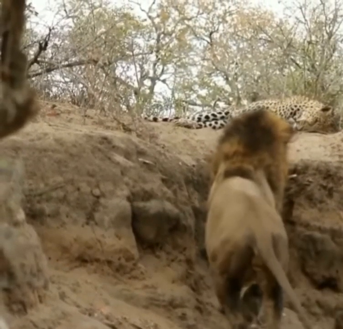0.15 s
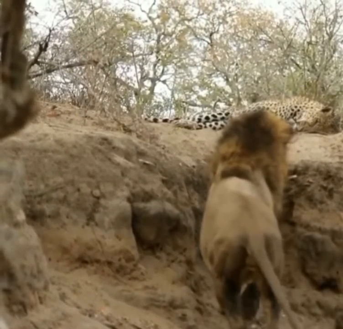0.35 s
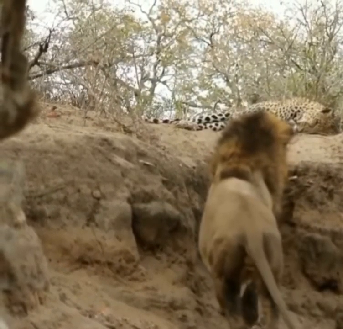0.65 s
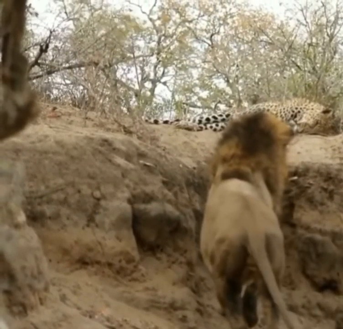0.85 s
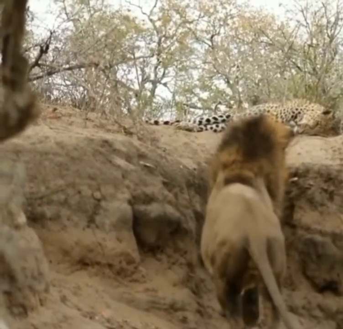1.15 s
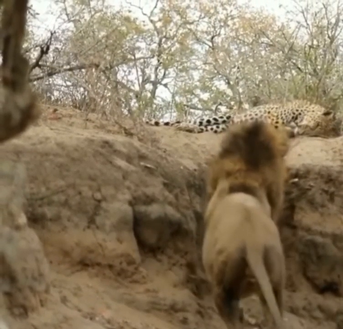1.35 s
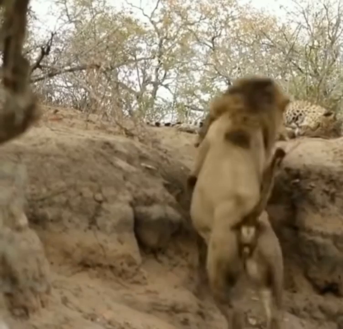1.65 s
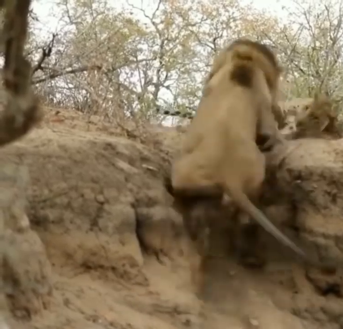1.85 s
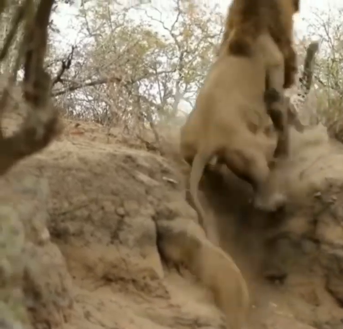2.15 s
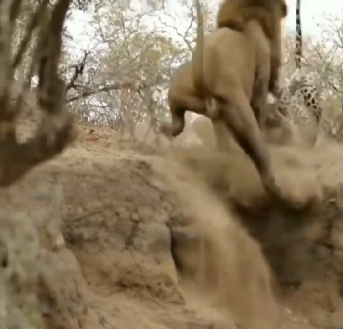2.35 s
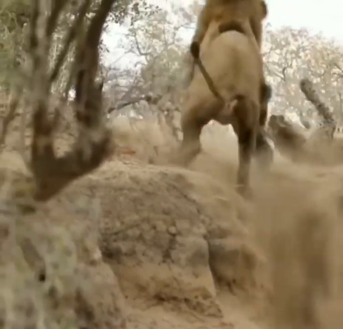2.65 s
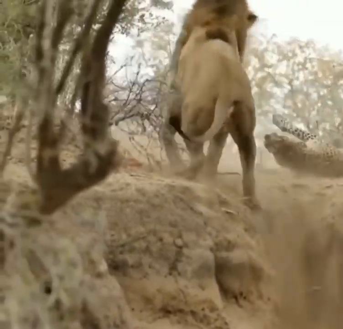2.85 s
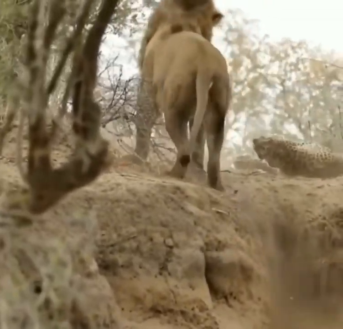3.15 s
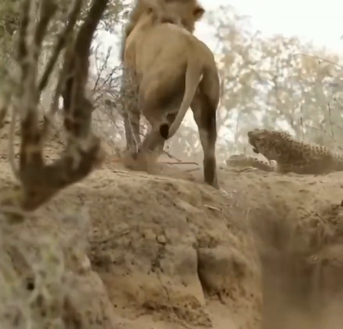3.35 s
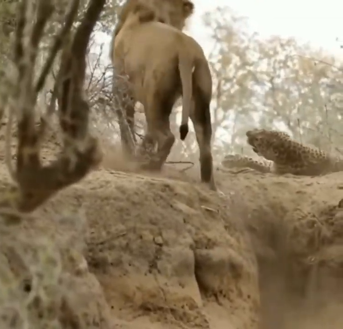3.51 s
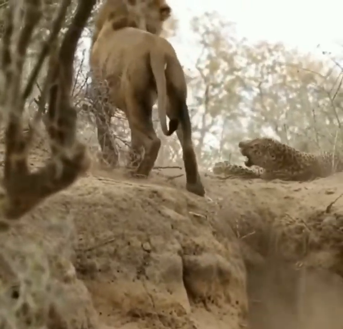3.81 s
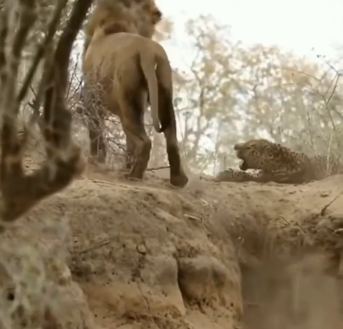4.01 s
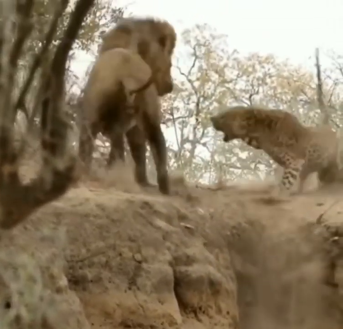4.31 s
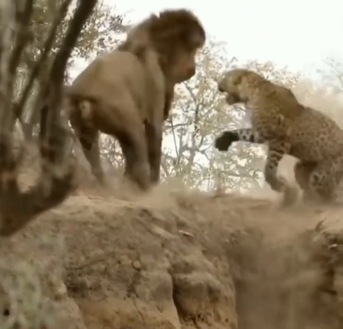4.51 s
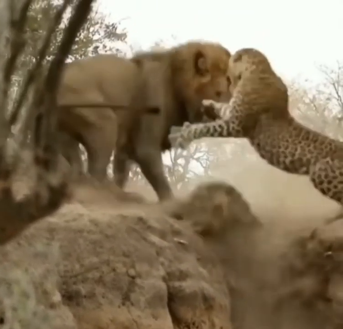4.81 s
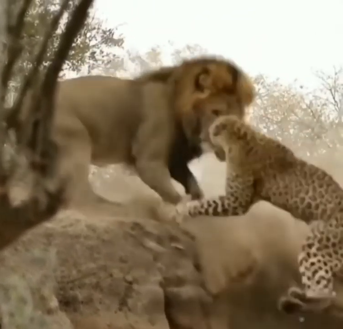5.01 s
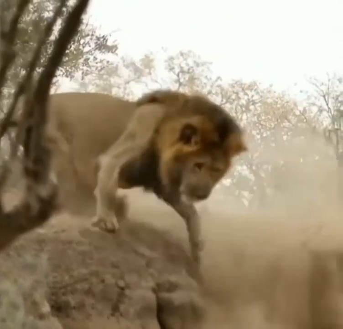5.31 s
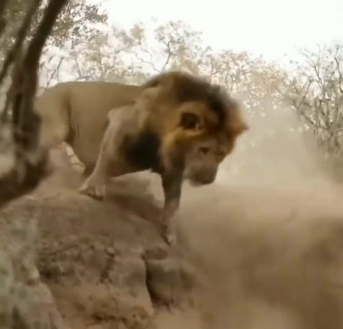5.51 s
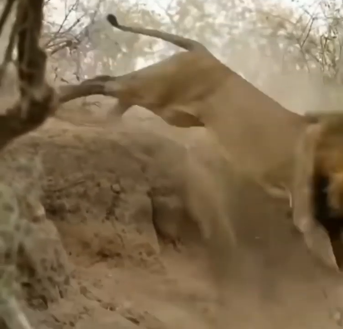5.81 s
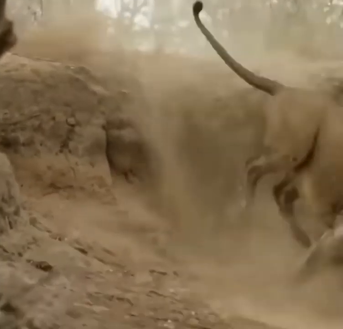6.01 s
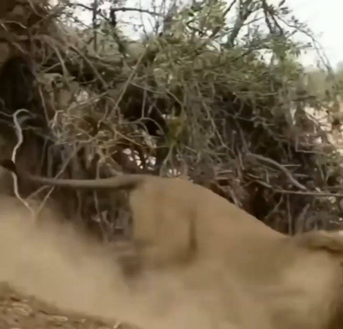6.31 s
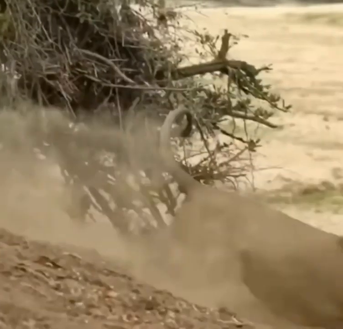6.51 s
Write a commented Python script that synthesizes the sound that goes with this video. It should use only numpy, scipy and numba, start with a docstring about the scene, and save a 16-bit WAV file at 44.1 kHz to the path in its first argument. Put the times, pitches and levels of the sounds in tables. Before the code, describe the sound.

After a quiet, gusty opening, a lion and a leopard growl low and snarl harshly, paws scuffing dry sand amid heavy wind thumps.

```python
"""On a dry earth bank two big cats snarl and growl, heard by a single microphone.
Slack throat tissue flaps and chops the voice, pulses and rough breath, into bursts; throat and mouth resonate.
Paws scatter sand, a noise of dense grains, and twigs snap as short noise bursts, over the faint hiss of bush.
Gusts thump, rumble and pop on the microphone as shaped low noise; a thin faint note slides up early on."""
import sys
import numpy as np
from scipy import signal
from scipy.fft import rfft, irfft, next_fast_len
from scipy.io import wavfile
from scipy.ndimage import uniform_filter1d, map_coordinates
from numba import njit

SR = 44100
rng = np.random.default_rng(int(sys.argv[2]) if len(sys.argv) > 2 else 0)


def transcribe(signal):
    """Save signal, clipped to [-1, 1], as a 16-bit WAV file at the path in sys.argv[1]."""
    frames = np.atleast_2d(signal).T
    limited = np.clip(frames, -1, 1)
    pcm = np.round(limited * 32767).astype(np.int16)
    wavfile.write(sys.argv[1], SR, pcm)


N = 293794


def amp(db):
    """Decibel law: the amplitude gain of a level in dB."""
    return 10 ** (np.asarray(db) / 20)


def unit(x):
    """Power normalisation: x at rms 1."""
    return x / np.sqrt(np.mean(x ** 2) + 1e-20)


def steady(x):
    """Short-term power normalisation: x held at rms 1 over a tenth of a second."""
    return x / np.sqrt(np.abs(uniform_filter1d(x * x, size=SR // 10)) + 1e-12)


def curves(rows):
    """Linear interpolation: one value per sample for each column after the time in seconds."""
    seconds, *columns = np.transpose(rows)
    return [np.interp(np.arange(N) / SR, seconds, column) for column in columns]


def wobble(rate):
    """Slow random fluctuation: a smooth curve through random knots, rate of them a second."""
    knots = rng.standard_normal(int(N * rate / SR) + 4)
    return map_coordinates(knots, [np.arange(N) * rate / SR])


def filtered(x, response):
    """Linear filtering: the spectrum of x times a response of frequency in Hz."""
    size = next_fast_len(N + SR // 2)
    return irfft(rfft(x, size) * response(np.fft.rfftfreq(size, 1 / SR)), size)[..., :N]


def coloured(x, spectrum):
    """Spectral shaping: x through points of (Hz, dB) on a log frequency axis, at rms 1."""
    f, db = np.transpose(spectrum)
    return unit(filtered(x, lambda hz: amp(np.interp(np.log(hz + 1), np.log(f + 1), db))))


@njit
def ring(x, turn, fade):
    """Damped resonance with a moving centre: turn in radians a sample, fade the factor kept each sample."""
    y = np.zeros(len(x))
    for i in range(2, len(x)):
        feedback = 2 * fade * np.cos(turn[i]) * y[i - 1] - fade * fade * y[i - 2]
        y[i] = feedback + (1 - fade) * (x[i] - x[i - 2])
    return y


def cavity(x, hz, width_hz):
    """Cavity resonance: a narrow and a wider stage in cascade, with about unit gain at the centre."""
    turn = 2 * np.pi * hz / SR * np.ones(N)
    fade = np.exp(-np.pi * width_hz / SR)
    return ring(ring(x, turn, fade), turn, fade ** 3)


def bush():
    """Broadband leaf noise: the far hiss of many leaves in the breeze, drifting in level."""
    # Each row: frequency in Hz, relative response in dB.
    leaf_spectrum = [(40, 0), (100, 3), (800, -5), (3460, -16.5), (7970, -22), (13000, -29.5)]
    return amp(-43 + 1.3 * wobble(4.2)) * coloured(rng.standard_normal(N), leaf_spectrum)


def wind():
    """Turbulent pressure on the port: eddies thump over a lumpy rumble, and hard thumps are brighter."""
    # Gust thumps. Each row: start in seconds, strength in dB.
    thump_rows = [(0.757, -22), (0.948, -17), (1.001, -19.5), (1.301, -2), (1.331, -1.5), (1.362, -14),
                  (1.634, -5), (1.678, -13), (1.713, -8), (1.744, -9), (1.847, -5.5), (2.013, -15),
                  (2.13, -4), (2.257, -10.5), (2.873, -16), (3.594, -7), (3.66, -11), (3.695, -2),
                  (3.778, -4), (3.853, -3.5), (3.952, -1.5), (4.043, -1.5), (4.107, -0.5), (5.085, -13.5),
                  (5.754, -4), (5.784, -6), (5.898, -6), (5.945, -12), (6.083, -12), (6.388, -4.5),
                  (6.527, -8), (6.574, -2.5), (6.631, -3)]
    # Rumble of the breeze. Each row: time in seconds, level in dB.
    breeze_rows = [(0, -66), (.25, -32), (.4, -52), (1.25, -40), (1.58, -35.5), (2.2, -28.5), (2.55, -25),
                   (3.1, -35.5), (4.1, -24.5), (4.5, -27.5), (4.75, -46), (5.65, -41), (5.8, -27),
                   (6.15, -36.5), (6.45, -17.5)]
    # Eddies on the microphone port. Each row: frequency in Hz, relative response in dB.
    port_spectrum = [(16, -46), (90, -3.5), (223, 0.5), (3000, -58.5), (6600, -120)]
    crest_db = 3.5  # peak of a thump over its rms
    brightens = 0.45  # extra dB of the upper part for each dB of strength
    body_db = -11  # low body of a thump relative to its strength

    t = np.arange(SR // 4) / SR
    rise = 1 - np.exp(-(t / 0.0071) ** 2)
    thump = rise * (np.exp(-(t / 0.019) ** 2) + 0.27 * np.exp(-t / 0.071))
    upper_swell, low_swell = np.zeros((2, N + SR))
    for start, db in thump_rows:
        span = slice(round(start * SR), round(start * SR) + len(t))
        upper_swell[span] += amp(db * (1 + brightens) - crest_db) * thump
        low_swell[span] += amp(db - crest_db + body_db) * thump

    eddies = coloured(rng.standard_normal(N) * amp(5.8 * wobble(70)), port_spectrum)
    rumble_spectrum = [(12, -15), (35, -16.5), (90, 0.0), (200, -8.5), (700, -57.5)]  # (Hz, dB)
    rumble = coloured(rng.standard_normal(N) * amp(5.2 * wobble(22)), rumble_spectrum)
    thumps = upper_swell[:N] * steady(eddies) + low_swell[:N] * steady(rumble)
    return thumps + amp(curves(breeze_rows)[0]) * rumble


def wind_pops():
    """Impulsive pressure inside the gusts: low-passed impulses, each with a random phase, push or pull."""
    # Each row: time in seconds, strength in dB.
    pop_rows = [(1.32, -2), (1.342, -10), (1.407, -7.5), (1.755, -9.5), (2.029, -13), (2.143, -3),
                (3.605, -9.5), (3.671, -11), (3.713, -4.5), (3.793, -8), (3.862, -11), (3.968, -5),
                (3.984, -5.5), (4.027, -5.5), (4.04, -4), (4.055, -8), (4.12, -3), (4.143, -8.5),
                (4.281, -16), (5.795, -14.5), (5.905, -11), (6.638, -11.5)]
    # Spectrum of a pop. Each row: frequency in Hz, relative response in dB.
    pop_spectrum = [(40, -30), (200, 1.5), (900, -18), (1500, -35), (5000, -95)]
    pop_level_db = 2.5  # level added to every pop
    kicks = np.zeros((2, N))
    for (start, db), phase in zip(pop_rows, 2 * np.pi * rng.random(len(pop_rows))):
        kicks[:, round(start * SR)] = amp(db + pop_level_db) * np.array([np.cos(phase), np.sin(phase)])
    quarter_turned = filtered(kicks[1], lambda hz: 1j)
    pops = coloured(kicks[0] + quarter_turned, pop_spectrum)
    return pops * np.hypot(*kicks).max() / np.abs(pops).max()


def sand():
    """Granular friction: sand and dry leaves slide as dense grains on a patchy hiss, and paws scuff them."""
    # Trickling sand. Each row: time in seconds, rustle level in dB.
    trickle_rows = [(1.85, -45.5), (2.3, -37.5), (3.05, -36.5), (3.12, -41), (3.9, -44), (4.25, -36.5),
                    (4.8, -34.5), (5.4, -37.5), (6.35, -34.5), (6.65, -38.5)]
    # Paws thrown into the sand. Each row: time of the peak in seconds, peak level in dB.
    scuff_rows = [(.03, -45), (4.42, -32), (5.25, -30)]
    # Each row: frequency in Hz, relative response in dB.
    rustle_spectrum = [(760, 3), (1300, 0.5), (2150, -0.5), (4500, -8.5), (7730, -3.5), (13000, -12)]
    scuff_s = 0.054  # how long a scuff swells and dies

    grains = rng.standard_normal(N) * (rng.random(N) < .02) * amp(1.95 * rng.exponential(size=N))
    grains = unit(uniform_filter1d(np.abs(grains), size=60))
    grainy = rng.standard_normal(N) * (1 + .5 * grains) * amp(0.58 * wobble(30))
    bins = signal.stft(grainy, nperseg=256)[2]
    # patches of louder and softer hiss, smoothed over frequency and then over time
    patches = uniform_filter1d(rng.standard_normal(bins.shape), size=10, axis=0)
    patches = uniform_filter1d(patches, size=12, axis=1)
    hiss = signal.istft(bins * amp(2 * unit(patches)), nperseg=256)[1][:N]

    t = np.arange(N) / SR
    scuffs = sum(amp(db) * np.exp(-((t - peak) / scuff_s) ** 2) for peak, db in scuff_rows)
    return (amp(curves(trickle_rows)[0]) + scuffs) * coloured(hiss, rustle_spectrum)


def twigs():
    """Brittle fracture: each snap is a band of noise with a steep onset and a 60 dB decay in 35 ms."""
    # Each row: start in seconds, level in dB ahead of the envelope, centre of the band in Hz.
    snap_rows = [(0.0423, -31.5, 3800), (0.066, -30.5, 3550), (1.9686, -25, 3800), (1.97, -17, 960),
                 (2.501, -25, 8600), (2.911, -29, 7075), (3.031, -29.5, 6990), (4.2392, -25, 7200),
                 (4.3888, -20.5, 3345), (4.437, -13.5, 7600), (4.4754, -26, 7800), (5.081, -27, 8000),
                 (5.967, -27.5, 8400), (6.344, -27.5, 5600)]
    snaps = np.zeros(N + SR)
    t = np.arange(SR // 20) / SR
    envelope = (1 - np.exp(-t / 0.00085)) * amp(-60 * t / 0.035)
    for start, db, hz in snap_rows:
        band = signal.butter(2, [0.62 * hz, min(1.38 * hz, 15000)], "bandpass", fs=SR)
        burst = signal.lfilter(*band, rng.standard_normal(len(t)))
        snaps[round(start * SR):][:len(t)] += amp(db) * unit(burst) * envelope
    return snaps[:N]


def chirp():
    """Harmonic glide: a thin faint note of three partials slides up, its second partial the strongest."""
    t = np.arange(N) / SR - .092
    phase = 2 * np.pi * 2280 * t * (1 + 0.64 * t)
    partials = np.sin(2 * phase) + .6 * (np.sin(phase) + np.sin(3 * phase))
    return amp(-47) * np.exp(-(t / 0.033) ** 2) * partials


def growls():
    """Effort governs the voice: as a growl fades, its flaps slow, its pitch sinks and it lets go.

    Returns mouth level, chest level, flap count, pitch, roughness and held share over time."""
    # Each row: start in seconds, attack in seconds, length in seconds, top level in dB, fade in dB,
    # fade shape (under 1 early, over 1 late), chest over mouth in dB, flaps a second at full effort,
    # settled pitch in Hz, sinking of the pitch in Hz, settled roughness 0-1, share of held note 0-1.
    growl_rows = [(2.432, 0.054, .27, -22.5, 10.5, 0.29, 6.5, 42.67, 185.2, 30.7, 0.28, 0.17),
                  (2.739, 0.1, 0.3, -32.5, 10, 1.14, 0.57, 33.6, 145.2, 33, 0.44, .3),
                  (3.108, 0.11, 0.44, -31, 8, .5, 6.6, 38, 146.3, 49.5, 0.18, .5),
                  (3.764, 0.036, 0.56, -33, 4.5, 1.08, 5.1, 34.04, 150, 8.3, 0.42, .4),
                  (4.32, 0.094, 0.385, -19, 13, 1.2, 2.5, 50.32, 214.5, 23.2, .22, .15),
                  (4.725, 0.026, 0.25, -34, 8, 1.07, 5.3, 37.5, 150.6, 37.7, 0.5, 0.39),
                  (4.99, 0.1342, 0.12, -34, -1, 1.1, 6.1, 36.5, 169.7, 5, 0.495, 1),
                  (5.167, 0.037, 0.27, -21.5, 7, 1.5, 8.14, 46.17, 226, 17.5, 0.29, 0.95),
                  (5.44, 0.019, 0.39, -26.5, 7.5, 1.54, 6.5, 35.34, 200.2, 20.2, 0.3, .1)]
    # One entry a growl: the time in seconds at which one of its flaps opens.
    flap_opens = [2.487, 2.8, 3.232, 3.815, 4.41, 4.75, 5.05, 5.37, 5.626]
    harsh_start, flat_start, settle_s = .4, .1, .07  # starts rougher and a share lower, then settles
    quiet_db, release_s = 13, 0.02  # rises from this far under; at the end sinks this much every release_s
    slow_flaps_per_db = 1.1  # flaps a second lost for each dB of effort lost
    chest_first_db = 3.5  # the chest speaks before the mouth opens

    columns = np.transpose(growl_rows)
    t = np.arange(N) / SR
    k = np.clip(np.searchsorted(columns[0], t) - 1, 0, None)  # the growl under way
    (start, attack, length, top_db, fade_db, shape,
     chest_db, flaps, pitch, sink_hz, rough, held) = columns[:, k]
    since = t - start
    spent = np.clip((since - attack) / (length - attack), 0, 1)
    lost_db = fade_db * spent ** shape
    edge = np.clip(np.maximum(1 - since / attack, (since - length) / release_s), 0, 8)
    edge[since < 0] = 8  # near silence before the first growl
    fresh = np.exp(-(np.clip(since, 0, None) / settle_s) ** 2)

    beat = np.cumsum(flaps - slow_flaps_per_db * lost_db) / SR
    beat = beat - np.interp(flap_opens, t, beat)[k] + 50 * (k + 1)  # counted anew for each growl
    beat = np.clip(beat, 1, 598)

    def glide(x):
        return uniform_filter1d(x, size=SR // 50)

    mouth_db = glide(top_db - lost_db - quiet_db * edge)
    chest_db = glide(chest_db + chest_first_db * np.clip(1 - since / attack, 0, 1))
    pitch = glide(pitch * (1 - flat_start * fresh) - sink_hz * spent)
    return mouth_db, chest_db, beat, pitch, glide(rough + harsh_start * fresh), glide(held)


def cats():
    """Source and filter: vocal folds pulse at the pitch, slack tissue flaps far slower, cavities ring."""
    # How the head is held. Each row: time in seconds, throat in Hz, lower mouth in Hz, upper mouth in Hz,
    # gape in dB, lips as a ratio on the frequencies of the upper cavities.
    mouth_rows = [(2.46, 386, 840, 1200, -7.5, 0.98), (2.7, 290, 855, 1140, -20, 0.96),
                  (3.25, 309, 806, 1023, -20.5, 0.99), (3.8, 276, 858, 1004, -30, 0.85),
                  (4.25, 280, 816, 1088, -8.5, 0.98), (4.36, 304.4, 784.6, 1109, -14.5, 0.97),
                  (4.43, 326, 844, 1003, -23, 0.915), (4.68, 254, 744.5, 1037, -22, 0.92),
                  (4.8, 225, 754.2, 1025, -10, 1.2), (5.12, 197, 790, 1005, -9, 1.07),
                  (5.28, 290, 804.6, 1090, -13, 0.974), (5.38, 270, 810, 1036, -27, 1.06),
                  (5.53, 403, 617.8, 1003, -14, 1.047), (5.61, 302, 696, 1010, -19, 0.96),
                  (5.8, 289.9, 763.7, 1057, -13, 1.11)]
    # Upper cavities. Each row: centre in Hz ahead of the lip ratio, width in Hz of the narrow stage,
    # level in dB ahead of the gape.
    upper_rows = [(1370, 320, -6), (1690, 152, 6.5), (2150, 240, -2.5), (2480, 500, -5), (3560, 230, -4.5)]
    mouth_db, chest_db, beat, pitch, rough, held = growls()
    throat_hz, low_hz, high_hz, gape_db, lips = curves(mouth_rows)
    rough, held = np.clip(rough, 0, 1), np.clip(held, 0, 1)

    # harsher air and lower notes blur the flaps
    chop = np.clip(1.05 - 0.75 * rough, 0, 1) * np.clip(pitch / 145, 0, 1) ** 2
    flap = beat + 0.0605 * wobble(25)
    force = amp(1.8 * rng.standard_normal(600))[flap.astype(int)]  # every flap lets out a different puff
    u = flap % 1
    gate = force * (1 - chop + chop * 21 * u * np.exp(-8.5 * u))  # bursts open fast and close slowly

    fold = np.cumsum(pitch * (1 + .25 * rough * wobble(90))) / SR
    pulses = np.diff(np.floor(fold), prepend=0) * np.sqrt(SR / pitch)
    breath = rng.standard_normal(N) * (1.82 + np.exp(-4 * (fold % 1)))  # air rushes once a cycle
    slaps = chop * force * (np.diff(np.floor(flap), prepend=0) > 0)  # the tissue slaps as it parts
    source = gate * (np.sqrt(1 - rough) * pulses + np.sqrt(rough) * breath) + 13 * slaps

    def voiced(hz, width_hz, x=source):
        shaken_hz = hz * (1 + 0.085 * rough * wobble(30))  # harsh air shakes the walls
        return steady(cavity(x, shaken_hz, width_hz))

    held_note = 0.76 * held * voiced(pitch, width_hz=48.8, x=source + 1.6 * pulses)
    puffed_thuds = 0.58 * (1 - held) * voiced(pitch, width_hz=104, x=source + 45 * slaps)
    dull_body = 1.4 * rough * voiced(pitch / 1.6, width_hz=88)
    # higher notes drive the throat harder
    throat = (pitch / 225) ** 1.6 * voiced(throat_hz, width_hz=55, x=source + 0.38 * pulses)
    chest = held_note + puffed_thuds + dull_body - throat + 0.22 * voiced(570, width_hz=127)

    lower_mouth = pitch / 210 * voiced(low_hz, width_hz=80)
    upper_mouth = 0.63 * (high_hz / 1050) ** 1.7 * voiced(high_hz, width_hz=85)
    mouth = lower_mouth - upper_mouth
    upper = sum(amp(db) * voiced(hz * lips, width_hz, source + 10 * slaps)
                for hz, width_hz, db in upper_rows)  # let out by an open gape
    return amp(mouth_db) * (mouth + amp(chest_db) * chest + amp(gape_db) * upper)


def bank_echo(voice):
    """Diffuse reflection: the bank returns a weak, dense echo that decays at 60 dB in 0.27 s."""
    t = np.arange(SR // 8) / SR
    bank = unit(rng.standard_normal(len(t)) * amp(-60 * t / 0.27)) / np.sqrt(len(t))
    return amp(-11.5) * signal.fftconvolve(voice, bank)[:N]


def scene():
    """Superposition: the pressures of all sources add at one microphone, alike in both channels."""
    voice = cats()
    mono = bush() + wind() + wind_pops() + sand() + twigs() + chirp() + voice + bank_echo(voice)
    return np.array([mono, mono])


def record(dry):
    """Saturation and band limit: high peaks are rounded; the sound dulls steeply above 13.1 kHz
    and stops at 15.7 kHz."""
    limit_hz = 15700
    rounded = dry / (1 + np.abs(dry / .73) ** 5) ** (1 / 5)

    def top_rolloff(hz):
        return amp(-18 * np.clip(hz - 13100, 0, None) / 1000) * (hz < limit_hz)  # 18 dB a kHz

    return filtered(rounded, top_rolloff)


dry = scene()
out = record(dry)
transcribe(out)
```